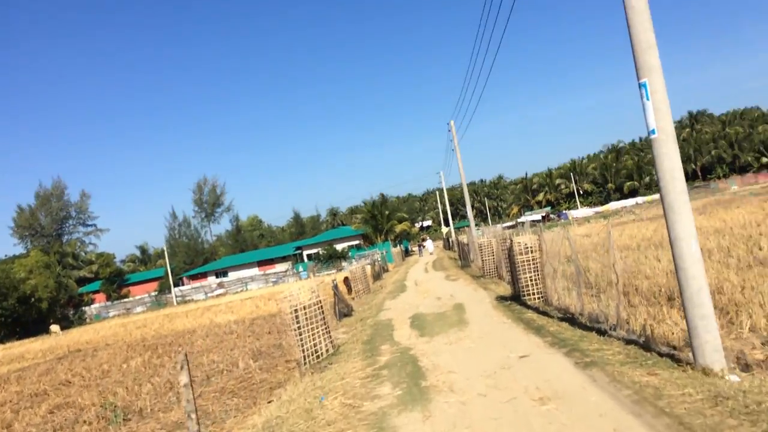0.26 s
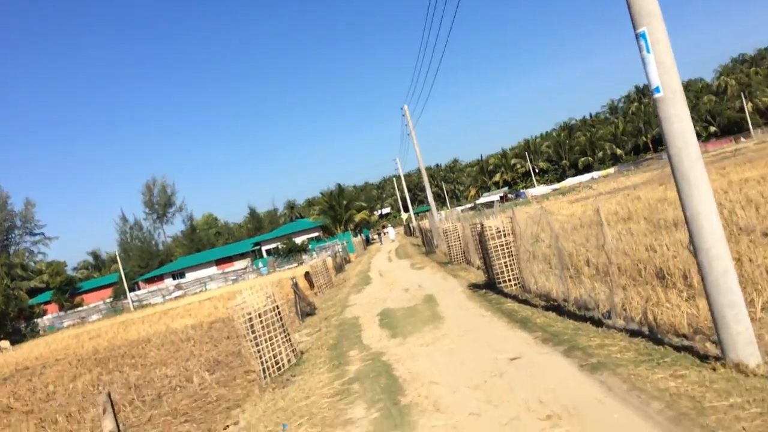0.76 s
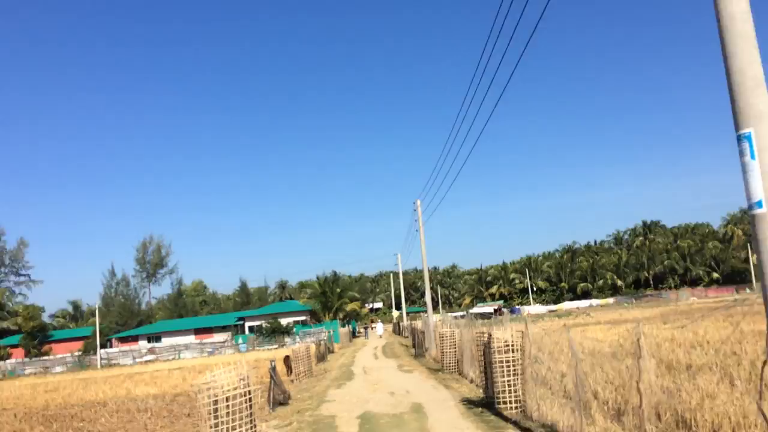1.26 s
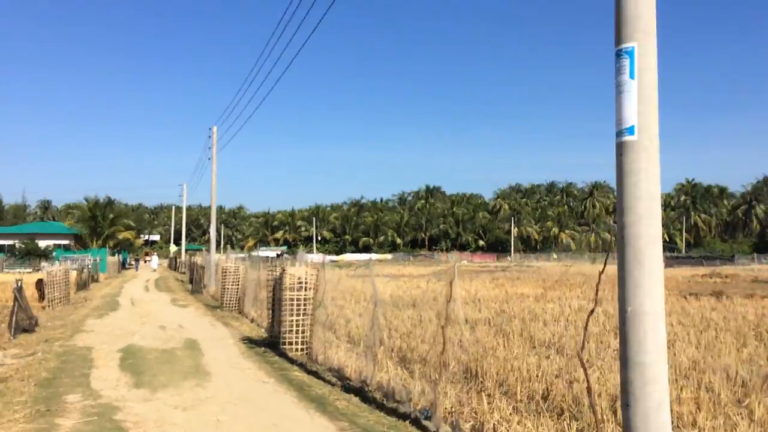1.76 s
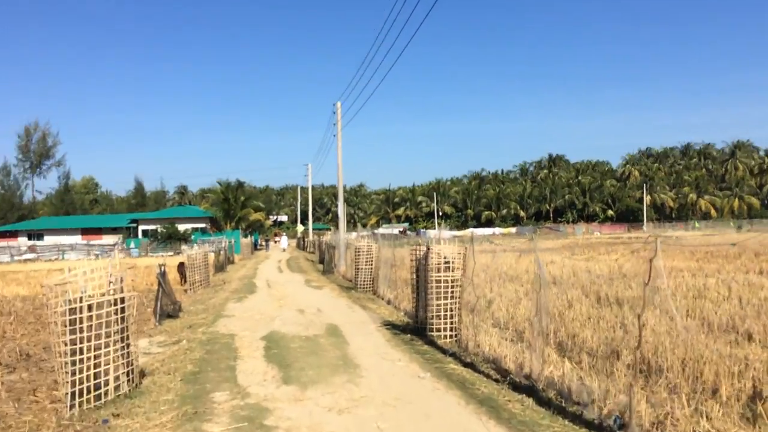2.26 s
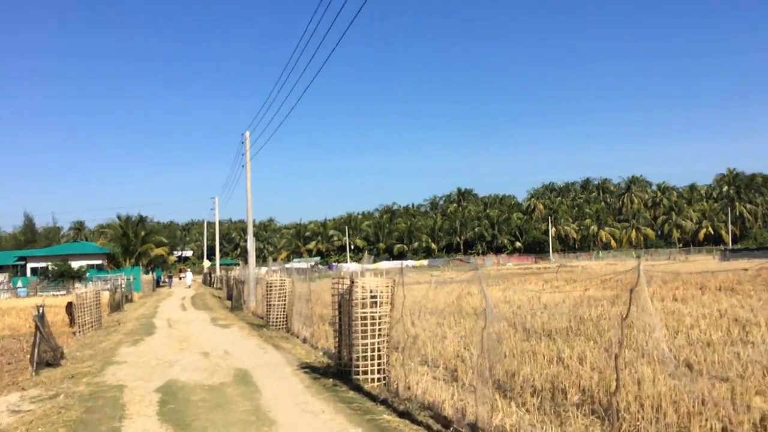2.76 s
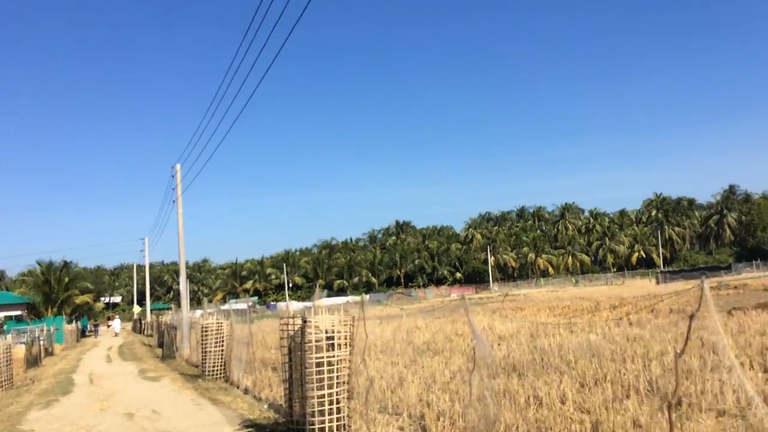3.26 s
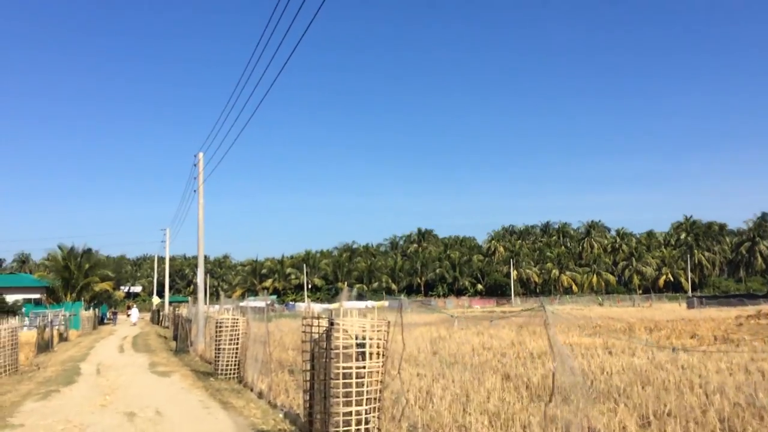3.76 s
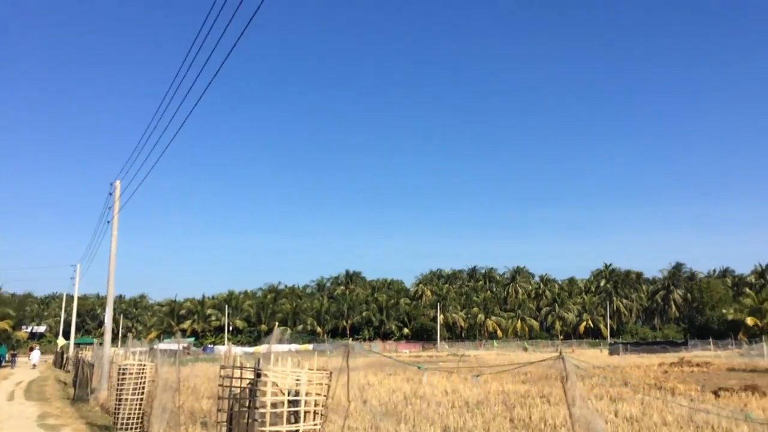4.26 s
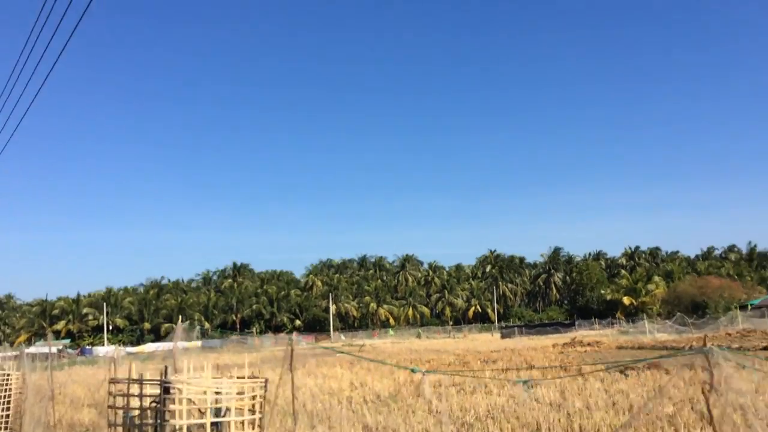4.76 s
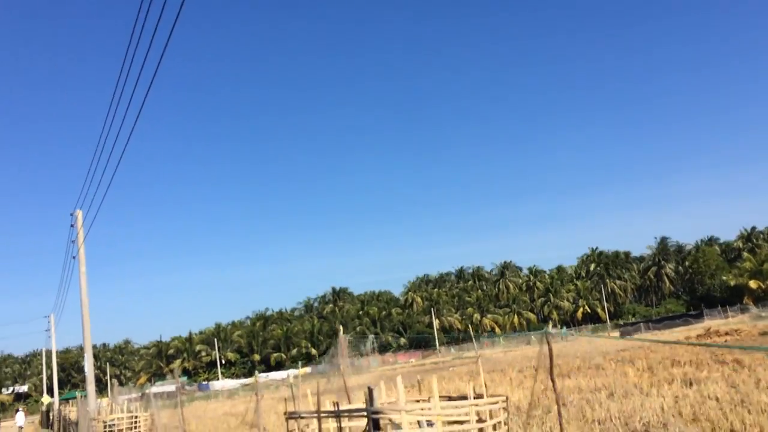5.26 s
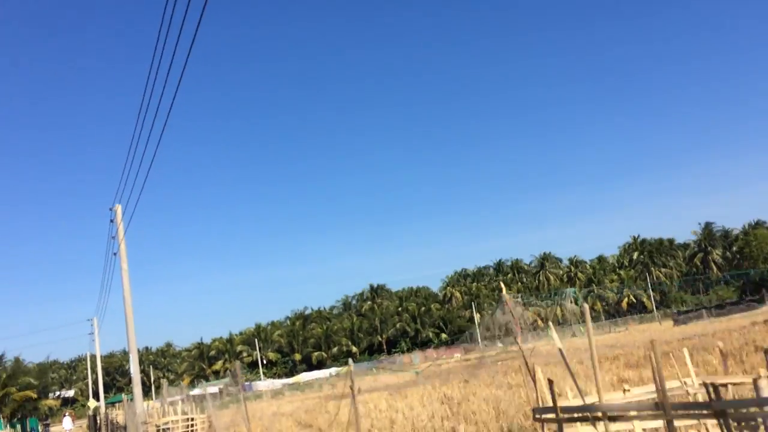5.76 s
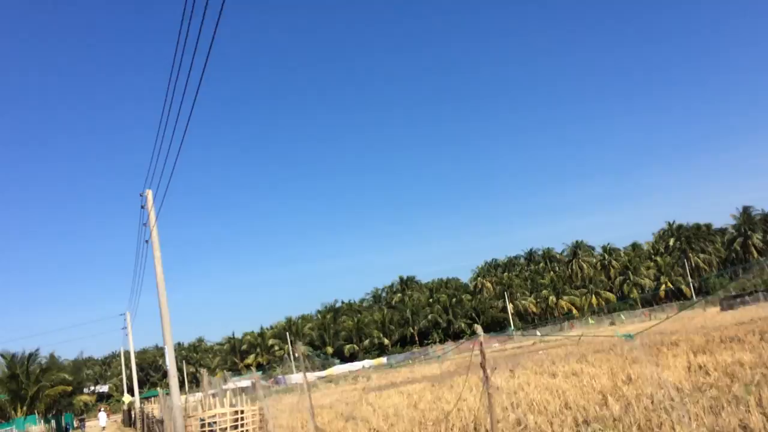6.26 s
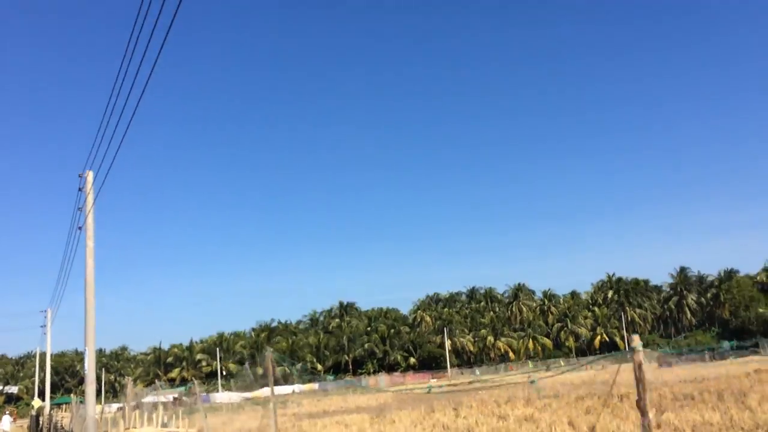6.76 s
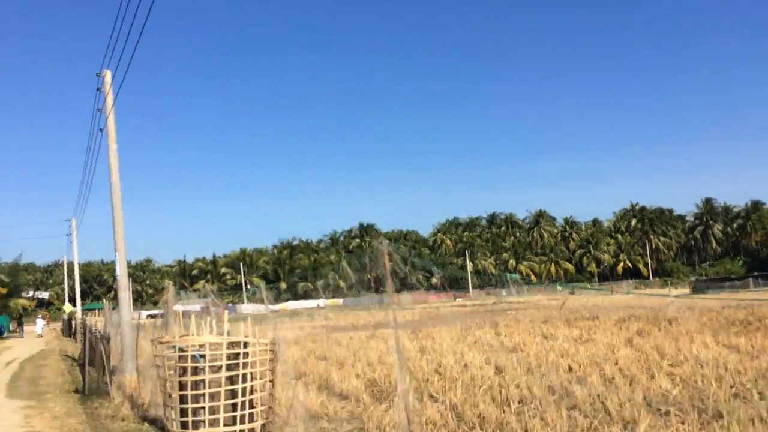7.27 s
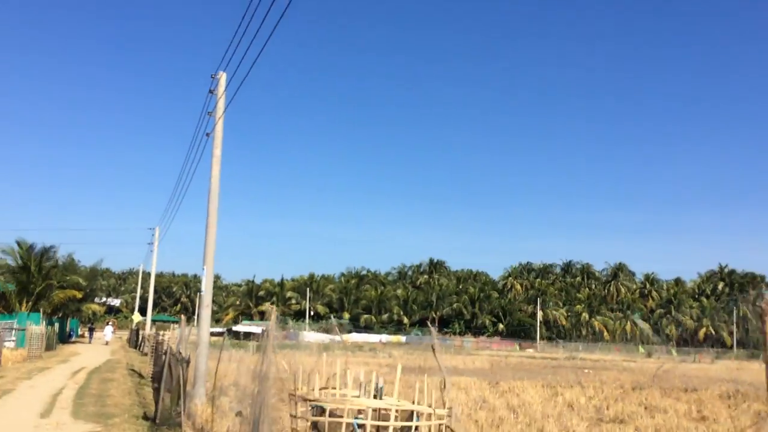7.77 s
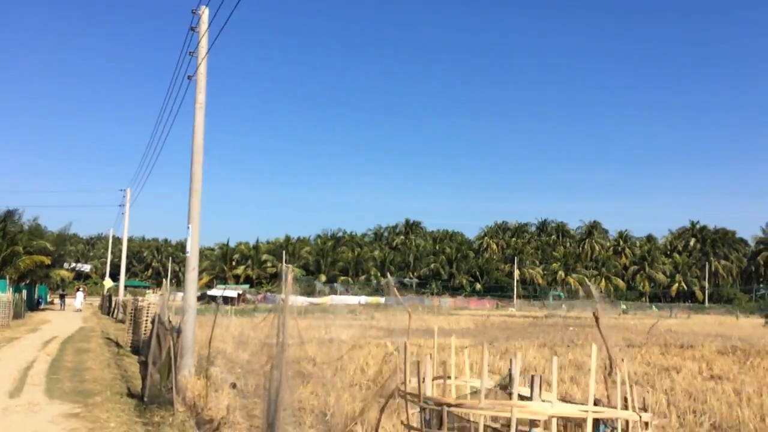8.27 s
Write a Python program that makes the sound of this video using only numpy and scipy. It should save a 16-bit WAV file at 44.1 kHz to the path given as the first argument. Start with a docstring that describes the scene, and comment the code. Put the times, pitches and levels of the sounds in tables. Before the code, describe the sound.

A bicycle rolls over a rough dirt lane in open fields, heard close and dry from a microphone held by the rider. Light metallic clinks begin at once over low wind rumble and faint tyre hiss. At 0.4 s a very loud, sharp jolt cracks through the frame, followed by dense jangling and a gritty stone crunch until about 0.9. Clinks thin out, then a rattling knock comes at 1.8 and another at 2.9. Wind thumps the microphone at 3.2 and strongly at 4.2, where a bright burst of clinks runs to 4.8. It calms, with sparse ticks and a duller knock at 5.9. Rattling returns from 6.7 to 7.4 with small crunches; a wind thump follows at 7.6, then scattered clinks to 8.5. Far away, a slow engine chugs about twelve beats a second, swelling gently; faint birdlike whistles appear, mostly around 6.5 to 7.

```python
"""Bicycle on a bumpy lane

A bicycle rolls along a dirt lane between open fields, the microphone held by the rider. Noise bursts through
resonances make loose metal clink and the frame knock; coloured grains and noise make the tyres crunch on grit.
Low noise and single pressure swings buffet the microphone. Far off, echo-smeared pulses make a slow
single-cylinder engine, perhaps a water pump; gliding sines whistle faintly over a hush of coloured noise."""
import sys
import numpy as np
from scipy import signal
from scipy.fft import rfft, irfft
from scipy.io import wavfile
from scipy.ndimage import uniform_filter1d

SR = 44100
rng = np.random.default_rng(int(sys.argv[2]) if len(sys.argv) > 2 else 0)


def generate_wav(signal):
    """Clip the signal to [-1, 1] and save it as 16-bit WAV at the path in sys.argv[1]."""
    frames = np.transpose(np.atleast_2d(signal))
    scaled = np.clip(frames, -1, 1) * 32767
    pcm = np.round(scaled).astype(np.int16)
    wavfile.write(sys.argv[1], SR, pcm)


N = 375291
TIME = np.arange(N) / SR   # seconds

# Hush of the open fields: pitch_hz [Hz], density_db [relative dB per Hz]
FIELD_SPECTRUM = [(100, -6), (250, -3), (330, -1), (430, -1.5), (560, -7), (820, -3), (1100, -5.5),
                  (1600, -24), (3000, -16.5), (9000, -50.5)]
FIELD_DB = -62   # rms

# Distant engine over time: time_s [s], thud_db [dB], exhaust_bark_db [dB], clatter_db [dB]
ENGINE_LEVELS = [(0, -65, -67.5, -60.5), (1, -61.5, -62, -65), (2.4, -56, -73.5, -69.5),
                 (3.6, -50.5, -68.5, -75), (4.8, -57, -68, -85), (5.5, -50, -67.5, -69),
                 (6.6, -49, -66.5, -80), (7.2, -56, -59, -70), (8, -58.5, -63.5, -63),
                 (8.5, -49, -61.5, -66)]
# Low exhaust thud: pitch_hz [Hz], density_db [relative dB per Hz]
THUD_SPECTRUM = [(90, -24), (125, -8.5), (155, 1.5), (190, 0), (228, -2.5), (265, -25), (320, -14),
                 (355, -25), (420, -32.5), (560, -37.5)]
# Exhaust bark: pitch_hz [Hz], density_db [relative dB per Hz]
BARK_SPECTRUM = [(280, -9), (322, 3.5), (360, -7), (420, -3), (465, -8), (550, -19)]
# Clatter of the mechanism: pitch_hz [Hz], density_db [relative dB per Hz]
CLATTER_SPECTRUM = [(400, -14), (560, -9), (700, -10), (800, -2.5), (950, -9.5), (1150, -9.5), (1500, -20)]
FIRING_HZ = 11.95
FIRST_BEAT_S, EXHAUST_LAG_S = .010, .021   # the exhaust opens a little after the mechanism knocks

# Faint far whistles, perhaps birds: start_s [s], length_s [s], start_hz [Hz], end_hz [Hz],
# level_db [peak dB before flutter]
FAR_WHISTLES = [(2.66, 0.067, 3080, 3020, -61), (5.692, 0.053, 4540, 5100, -62.5),
                (6.53, .17, 1860, 2450, -66), (6.70, .12, 2860, 3030, -53.5), (6.74, 0.14, 2550, 2420, -65),
                (6.86, .17, 2260, 2000, -66), (6.87, 0.164, 2010, 1880, -66),
                (7.393, 0.093, 4730, 4760, -63), (7.61, .09, 4900, 5240, -67),
                (8.158, 0.088, 2880, 2700, -65)]

# Turbulence at the microphone: pitch_hz [Hz], density_db [relative dB per Hz]
WIND_SPECTRUM = [(25, -20.5), (36, -9.5), (50, 0.5), (70, 0), (95, -1.5), (125, -8), (160, -12), (210, -18),
                 (270, -28), (450, -36)]
# Light airflow between gusts: time_s [s], level_db [dB before the wind trim]
BREEZE_LEVELS = [(0, -43.5), (1.2, -46.5), (2.3, -49), (2.85, -53), (3.7, -45), (4.6, -47), (5.9, -51),
                 (6.6, -48.5), (7.2, -47), (7.8, -47), (8.15, -56.5), (8.5, -41.5)]
# Gusts across the microphone: start_s [s], length_s [s], level_db [dB before the wind trim]
WIND_GUSTS = [(0, 0.082, -39.5), (.21, 0.15, -41.5), (.52, 0.09, -39), (.79, 0.17, -42.5),
              (1.67, 0.21, -44), (2.12, 0.23, -38), (2.51, .11, -42.5), (3.14, 0.11, -32.5),
              (3.37, 0.056, -42.5), (3.86, 0.15, -41), (4.14, 0.16, -37.5), (4.76, 0.066, -43.5),
              (5.12, 0.089, -41), (7.33, 0.2, -39), (7.53, 0.087, -36), (7.89, 0.073, -42.5)]
GUST_ATTACK_S, GUST_RELEASE_S = 0.0071, 0.025   # time constants
# Wind blows on the microphone: centre_s [s], level_db [peak dB before the band-pass], pitch_hz [Hz]
WIND_BUFFETS = [(.006, -24.5, 383), (0.21, -22.5, 78.4), (0.839, -26, 60.4), (2.158, -24.5, 82),
                (2.255, -24, 104), (2.525, -25, 88), (3.154, -34, 75), (3.189, -20, 101), (3.203, -26, 240),
                (3.876, -23, 61.4), (3.879, -36, 219), (4.186, -21, 148), (4.195, -17.5, 293),
                (4.358, -30, 336), (6.208, -31, 85), (7.613, -19.5, 82)]

# Rough patches that shake the whole bicycle: start_s [s], length_s [s],
# shake_db [dB re smooth rolling, power-added to it]
ROUGH_PATCHES = [(.40, 0.298, 21.5), (.80, 0.29, -1), (1.25, 0.043, 12.5), (1.80, 0.02, 28.5),
                 (2.58, 0.083, 10.5), (2.88, 0.19, 10.5), (4.25, 0.036, 19), (4.45, 0.24, 8),
                 (6.72, .15, 10.5), (7.15, 0.34, 8), (7.7, 0.27, -1.5), (8.25, 0.29, 7)]
BUMP_ATTACK_S, BUMP_RELEASE_S = .015, .085   # time constants of the shaking
JIGGLE_DB, TYRE_DB, TICK_DB = -85.5, -65, -64.5   # on smooth ground
TYRE_FOLLOWS, TICK_FOLLOWS = 0.39, 1   # share of the shaking's swing in dB
TICKS_PER_S, SHAKEN_TICKS_PER_S = 14, 30   # faint clinks on smooth ground and in the hardest shaking

# Tyre hiss on sand: pitch_hz [Hz], density_db [relative dB per Hz]
TYRE_SPECTRUM = [(380, -0.5), (550, -3.5), (900, -4), (1600, 2.5), (2200, -3.5), (3200, -7), (5000, -10.5),
                 (8000, -16), (11500, -19), (13000, -21.5), (16000, -24)]
# Stones crushed under a tyre: centre_s [s], level_db [dB at the peak of the swell],
# length_s [s, standard deviation of the swell], pitch_hz [Hz, nominal centre]
STONE_CRUNCHES = [(0.561, -44, 0.007, 2000), (0.847, -52.5, 0.0092, 1770), (2.62, -68, 0.024, 1710),
                  (7.071, -49, 0.0046, 1710), (7.392, -60, 0.0088, 1714), (7.41, -59, 0.012, 4350)]

# Clearest clinks of loose metal: start_s [s], level_db [rms dB of the first 6 ms, without thin steel],
# body_db [dB on the low modes before a shared boost]
METAL_CLINKS = [(0.017, -51, -10), (0.167, -50.5, -12), (0.197, -35, -12), (0.246, -46, -8),
                (0.285, -47, -1), (0.415, -42, -5), (0.441, -39, -11), (0.47, -47, 8), (0.496, -49, 10),
                (0.527, -33.0, -16), (0.536, -37.5, -7), (0.571, -40.5, -10), (0.619, -40.5, -11),
                (0.645, -37.5, -16), (0.658, -48, -19), (0.682, -53, -4), (0.735, -41.5, -13),
                (0.756, -38, -11.5), (0.851, -53.5, -4), (1.134, -52.0, -8), (1.244, -34, -10.5),
                (1.3, -55, -9), (1.397, -52, -8), (1.466, -52, -5), (1.636, -48.0, -10.5), (1.747, -46, 4),
                (1.767, -44.0, -6), (1.799, -35.5, -3), (1.803, -40, -5), (1.831, -35.5, -2),
                (1.855, -38.5, -1), (1.863, -40, -2), (1.98, -48.5, 20), (2.172, -44, -11.5),
                (2.19, -44.5, -8), (2.214, -45.5, -8), (2.254, -41.0, 0.5), (2.334, -44.0, -7.5),
                (2.364, -42, -5), (2.411, -39.5, -9), (2.604, -53, 5), (2.693, -48, -7.5),
                (2.946, -42.0, -5), (2.991, -42, -9.5), (3.027, -46.5, -9), (3.054, -49, -10),
                (3.183, -43.0, -6), (3.246, -42.5, -12), (3.363, -45, -3.5), (3.444, -41.5, -11),
                (3.539, -54, -1), (3.627, -43, -5.5), (3.713, -48, -5.5), (3.829, -50.5, -1),
                (3.89, -51.5, -6), (3.98, -53, -1), (4.021, -45.5, -9.5), (4.215, -41.0, -1),
                (4.242, -31.5, -6), (4.27, -30, -11), (4.293, -34.5, -6.5), (4.318, -35.5, -11),
                (4.345, -43.5, -4), (4.418, -45, -14.5), (4.444, -45.5, -7), (4.479, -48.5, -12),
                (4.505, -46.5, -13), (4.531, -42.5, -7), (4.556, -39, -14), (4.585, -37.5, -13),
                (4.622, -37, -9.5), (4.663, -48, -9), (4.716, -49.5, -6), (4.747, -46, -10),
                (4.772, -43.5, -11), (4.81, -52.5, -7), (5.142, -53.5, -4.5), (5.244, -51, -4.5),
                (5.647, -45.5, -5), (5.817, -47, -1.5), (5.949, -53, 0), (6.326, -47.5, -4),
                (6.527, -49.5, -8), (6.571, -50.0, -10), (6.699, -39.5, -9), (6.73, -46.0, -5),
                (6.752, -44, -10), (6.784, -43.5, -8), (6.824, -44, -5.5), (6.889, -40.5, -8.5),
                (7.004, -42, -13), (7.108, -41, -12), (7.156, -39, -9), (7.177, -39.5, -8),
                (7.195, -40, -12.5), (7.256, -35.5, -12.5), (7.277, -41.5, -4), (7.301, -41, -20),
                (7.408, -44, 13.5), (7.456, -53, 0), (7.741, -46.5, -1.5), (7.811, -42, -9.5),
                (7.835, -49, -6), (7.878, -51.5, -6), (7.947, -43.5, -7.5), (8.273, -48.5, -6),
                (8.403, -53, -4.5), (8.473, -51, -5), (8.504, -45.5, -9)]
# What the loose parts ring with: pitch_hz [Hz], width_hz [Hz], level_db [relative dB]
LOOSE_METAL_MODES = [(1588, 320, -7.5), (2440, 125, -6.5), (3164, 220, -0.5), (3650, 330, -7),
                     (4260, 420, -7.5), (4974, 190, -7.5), (5620, 300, -10.5), (6660, 300, -5),
                     (7887, 470, -3.5), (8354, 260, 1), (8930, 448, -6.5), (9880, 600, -8.5),
                     (11420, 370, -5.5), (13560, 620, -23.5), (15350, 400, -17.5)]
LOOSE_METAL_HZ = np.array(LOOSE_METAL_MODES)[:, 0]
# Thin steel that sings on: pitch_hz [Hz], level_db [dB re clink, before hardness], t60_s [s]
THIN_STEEL = [(11208, -30, .45), (8350, -13.5, 0.04), (15490, -30, .1), (6570, -36, 0.11),
              (11800, -29, .08)]

# Hard jolts: start_s [s], level_db [rms dB of the first 6 ms, without the ring], low_hz [Hz], high_hz [Hz],
# t60_s [s], ring_hz [Hz], ring_db [peak dB], ring_t60_s [s]
FRAME_JOLTS = [(0.3924, -22.5, 3020, 15000, 0.012, 4030, -14, 0.016),
               (0.3933, -21, 1560, 6700, 0.0096, 1800, -24, 0.028),
               (0.3979, -40.5, 246, 1500, 0.074, 813, -34, 0.044),
               (1.8220, -30, 1450, 3500, 0.023, 279, -36.5, 0.12),
               (1.8243, -31.5, 2380, 12200, 0.015, 3530, -19, 0.014),
               (2.8717, -34.5, 1000, 2170, .055, 1083, -43.5, 0.24),
               (2.8747, -29.5, 1700, 11000, 0.012, 1670, -40, 0.11),
               (5.901, -34.5, 330, 5300, .05, 480, -33, 0.026),
               (5.9060, -34.5, 900, 6600, 0.021, 2376, -34.5, 0.1)]
# Frame and mudguards: pitch_hz [Hz], width_hz [Hz], level_db [relative dB]
FRAME_RESONANCES = [(400, 97, 0), (800, 96, -8), (1100, 360, -4.5), (1500, 260, -0.5), (1890, 260, -2.5),
                    (2570, 350, -1.5), (3470, 640, 1), (4200, 210, 1.5), (5330, 410, 1), (6140, 490, 0),
                    (8050, 1700, -3.5), (10400, 600, -1), (12730, 910, 1.5)]

CUTOFF_HZ = 15900   # top of the finished sound


def from_db(db):
    """Turn decibels into gain."""
    return 10 ** (np.asarray(db) / 20)


def rms_one(x):
    """Scale a signal to unit rms."""
    return x / np.sqrt(np.mean(x ** 2) + 1e-20)


def level(rows):
    """Draw a gain curve through (time_s, level_db) points."""
    return from_db(np.interp(TIME, *np.transpose(rows)))


def add(out, start_s, sound):
    """Mix a sound in at a time."""
    at = max(0, round(start_s * SR))
    out[at:at + len(sound)] += sound[:max(0, N - at)]


def coloured(x, points):
    """Shape a signal with a smooth spectrum that falls 20 dB per octave beyond its ends; unit rms."""
    hz, db = np.transpose(points)
    octave = np.log2(np.fft.rfftfreq(len(x), 1 / SR) + 1)
    marks = np.log2(hz)
    beyond = np.abs(octave - np.clip(octave, marks[0], marks[-1]))
    gain = from_db(np.interp(octave, marks, db) - 20 * beyond)
    return rms_one(irfft(rfft(x) * gain, len(x)))


def drift(rate):
    """Wander by chance through points of unit spread, rate points per second."""
    return np.interp(TIME * rate, np.arange(4000), rng.standard_normal(4000))


def band(x, low_hz, high_hz, order=2):
    """Band-pass a signal causally."""
    edges = [low_hz, min(high_hz, .45 * SR)]
    return signal.sosfilt(signal.butter(order, edges, "band", fs=SR, output="sos"), x)


def swells(rows, attack_s, release_s):
    """Gain from (start_s, length_s, level_db) rows: each rises, holds and dies away; their powers add."""
    power = 0
    for start_s, length_s, db in rows:
        before = np.maximum(start_s - TIME, 0) / attack_s
        after = np.maximum(TIME - start_s - length_s, 0) / release_s
        envelope = np.exp(-np.minimum(before + after, 20))
        power = power + (from_db(db) * envelope) ** 2
    return np.sqrt(power)


def dying(t, t60):
    """Decay exponentially by 60 dB in t60 seconds."""
    return np.exp(-np.log(1000) * t / t60)


def grains(per_s, size_db):
    """Scatter tiny clicks of random sign and uneven size."""
    happens = rng.random(N) < per_s / SR
    sign = rng.choice([-1, 1], N)
    return happens * sign * from_db(size_db * np.minimum(rng.exponential(1, N), 4))


def resonate(x, modes, extra_db):
    """Ring parallel resonances of alternating sign, each with an added gain."""
    out = 0
    for k, (hz, width_hz, db) in enumerate(modes):
        r = np.exp(-np.pi * width_hz / SR)   # a wider mode dies sooner
        gain = (-1) ** k * from_db(db + extra_db[k]) * (1 - r * r) / 2
        poles = [1, -2 * r * np.cos(2 * np.pi * hz / SR), r * r]
        out = out + signal.lfilter([gain, 0, -gain], poles, x)
    return out


def contact(t60, tail_db, tail_t60, snap):
    """A sharp touch, a dense dying chatter, and a faint shiver of the rest of the bicycle."""
    t = TIME[:SR // 5]
    envelope = dying(t, t60) + from_db(tail_db) * dying(t, tail_t60)
    force = rng.standard_normal(len(t)) * envelope
    force[0] += snap
    return force


def at_level(hit, db):
    """Set the rms of a hit's first 6 ms."""
    return hit * from_db(db) / np.sqrt(np.mean(hit[:round(.006 * SR)] ** 2))


def field():
    """Steady noise, coloured as the hush of open fields."""
    return from_db(FIELD_DB) * coloured(rng.standard_normal(N), FIELD_SPECTRUM)


def scattered(firings, t60):
    """Smear every beat by the same echoes from trees and walls."""
    t = TIME[:round(SR / FIRING_HZ)]
    echoes = rfft(rng.standard_normal(len(t)) * dying(t, t60))
    beat = irfft(echoes / np.abs(echoes))   # many paths even out the spectrum
    return signal.fftconvolve(firings, beat)[:N]


def engine(thud_t60=0.37, bark_t60=.17, clatter_t60=0.26):
    """Evenly spaced beats: the mechanism clatters, then the exhaust barks and its low thud lingers."""
    firings, rows = np.zeros(N), np.array(ENGINE_LEVELS)
    at = np.arange(FIRST_BEAT_S * SR, N - 1, SR / FIRING_HZ).astype(int)
    firings[at] = from_db(rng.normal(0, .7, len(at)))   # beats differ slightly in strength
    exhaust = np.roll(firings, round(EXHAUST_LAG_S * SR))
    thud = coloured(scattered(exhaust, thud_t60), THUD_SPECTRUM) * level(rows[:, [0, 1]])
    bark = coloured(scattered(exhaust, bark_t60), BARK_SPECTRUM) * level(rows[:, [0, 2]])
    clatter = coloured(scattered(firings, clatter_t60), CLATTER_SPECTRUM) * level(rows[:, [0, 3]])
    return thud + bark + clatter


def whistles(waver=0.032, flutter_db=2.5):
    """Thin wavering sine glides that swell, flutter and fade."""
    out, wobble = np.zeros(N), 1 + waver * drift(160)
    for start_s, length_s, start_hz, end_hz, db in FAR_WHISTLES:
        u, at = np.linspace(0, 1, round(length_s * SR)), round(start_s * SR)
        hz = (start_hz + (end_hz - start_hz) * u) * wobble[at:at + len(u)]
        tone = np.sin(2 * np.pi * np.cumsum(hz) / SR)
        add(out, start_s, from_db(db) * np.sin(np.pi * u) * tone)
    return out * from_db(flutter_db * drift(90))


def wind(trim_db=0.5, lumpy_db=2.0, low_cut_hz=35, top_hz=520):
    """Lumpy turbulence at the microphone; single eddies pass as one swing of pressure."""
    rumble = coloured(rng.standard_normal(N), WIND_SPECTRUM)
    rumble /= np.sqrt(uniform_filter1d(rumble ** 2, size=SR // 12))   # the airflow alone sets the slow swell
    airflow = np.hypot(level(BREEZE_LEVELS), swells(WIND_GUSTS, GUST_ATTACK_S, GUST_RELEASE_S))
    out = rumble * airflow * from_db(trim_db + lumpy_db * drift(25))
    for centre_s, db, hz in WIND_BUFFETS:
        u = np.clip(2 * np.pi * hz * (TIME - centre_s), -10, 10)
        out += from_db(db) * u * np.exp((1 - u * u) / 2)
    return band(out, low_cut_hz, top_hz, order=4)   # the port passes neither the slowest nor the finest eddies


def tyres(shake, grains_per_s=1200, size_db=5.5, grit=0.68, uneven_db=0.5):
    """Sand hisses and cracks under the tread, louder on rough ground; now and then a small stone is crushed."""
    sand = grit * rms_one(grains(grains_per_s, size_db)) + rng.standard_normal(N)
    roughness = shake ** TYRE_FOLLOWS
    out = coloured(sand, TYRE_SPECTRUM) * roughness * from_db(TYRE_DB + uneven_db * drift(30))
    for centre_s, db, length_s, hz in STONE_CRUNCHES:
        swell = np.exp(-.5 * ((TIME - centre_s) / length_s) ** 2)
        out += rms_one(band(sand, hz / 1.63, hz * 1.37)) * from_db(db) * swell
    return out


def jiggle(shake, touches_per_s=240, size_db=4.0, smooth=.45, body_db=1.5, body_hz=5400):
    """Chain and fittings chatter in many tiny touches until the shaking dies down."""
    force = rms_one(grains(touches_per_s, size_db)) + smooth * rng.standard_normal(N)
    strengths_db = body_db * (LOOSE_METAL_HZ < body_hz)
    return rms_one(resonate(force, LOOSE_METAL_MODES, strengths_db)) * shake * from_db(JIGGLE_DB)


def ticks(shake, spread_db=1.5, body_db=-1.5):
    """Pick faint clinks at random, more often and harder with more shaking; rows as in METAL_CLINKS."""
    slots = np.arange(0, N, SR // 100)
    chance, size = rng.random(len(slots)), rng.standard_normal(len(slots))
    shake_db = 20 * np.log10(shake[slots])
    per_s = TICKS_PER_S + (SHAKEN_TICKS_PER_S - TICKS_PER_S) * shake_db / shake_db.max()
    levels_db = TICK_DB + TICK_FOLLOWS * shake_db + spread_db * size
    happens = chance < per_s * slots[1] / SR
    return [(at / SR, db, body_db) for at, db in zip(slots[happens], levels_db[happens])]


def clinks(rows, body_hz=5400, boost_db=5.5, vary_db=2.0, hard_db=-40, top_hz=11000, brighten=.4):
    """Loose metal is thrown against the frame and bounces once more; hard hits set thin steel singing."""
    out, t = np.zeros(N), TIME[:SR // 2]
    for start_s, db, body_db in rows:
        force = contact(t60=rng.uniform(0.024, .026), tail_db=-34.5, tail_t60=0.48, snap=6.2)
        bounce_delay = round(rng.uniform(.001, .005) * SR)
        force += np.pad(force, (bounce_delay, 0))[:len(force)] * rng.uniform(0, .6)
        hardness_db = brighten * (db - hard_db)   # a harder contact is shorter, so it reaches higher modes
        strengths_db = (LOOSE_METAL_HZ < body_hz) * (body_db + boost_db)
        strengths_db = strengths_db + (LOOSE_METAL_HZ > top_hz) * hardness_db
        strengths_db = strengths_db + rng.normal(0, vary_db, len(LOOSE_METAL_HZ))
        add(out, start_s, at_level(resonate(force, LOOSE_METAL_MODES, strengths_db), db))
        for hz, mode_db, t60 in THIN_STEEL:
            gain = from_db(db + mode_db + hardness_db + rng.normal(0, vary_db))
            add(out, start_s, gain * np.sin(2 * np.pi * hz * t) * dying(t, t60))
    return out


def knocks(vary_db=0.5, leak=0.19):
    """Hard jolts strike the frame; each place of contact favours a band and leaves one part ringing."""
    out, t = np.zeros(N), TIME[:SR // 3]
    for start_s, db, low_hz, high_hz, t60, ring_hz, ring_db, ring_t60 in FRAME_JOLTS:
        force = contact(t60, tail_db=-13.5, tail_t60=0.099, snap=6.7)
        force = band(force, low_hz, high_hz, order=3) + leak * band(force, low_hz / 2, high_hz * 2)
        strengths_db = rng.normal(0, vary_db, len(FRAME_RESONANCES))
        add(out, start_s, at_level(resonate(force, FRAME_RESONANCES, strengths_db), db))
        add(out, start_s, from_db(ring_db) * np.sin(2 * np.pi * ring_hz * t) * dying(t, ring_t60))
    return out


def scene():
    """Mix the hush of fields, far engine, whistles and wind with the bicycle close by, shaken by the lane."""
    outdoors = field() + engine() + whistles() + wind()
    shake = np.hypot(1, swells(ROUGH_PATCHES, BUMP_ATTACK_S, BUMP_RELEASE_S))   # 1 on smooth ground
    loose_metal = jiggle(shake) + clinks(ticks(shake)) + clinks(METAL_CLINKS)
    bicycle = tyres(shake) + loose_metal + knocks()
    return (outdoors + bicycle)[None]


def record(dry):
    """Cut the top steeply with an elliptic low-pass."""
    return signal.sosfilt(signal.ellip(10, .2, 90, CUTOFF_HZ, fs=SR, output="sos"), dry)


dry = scene()
out = record(dry)
generate_wav(out)
```